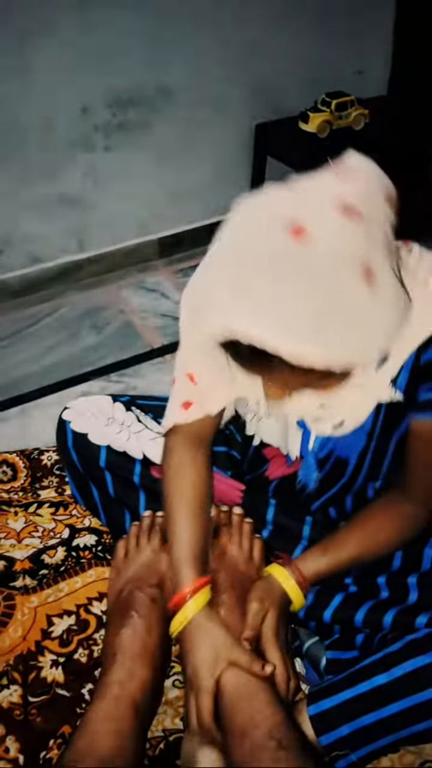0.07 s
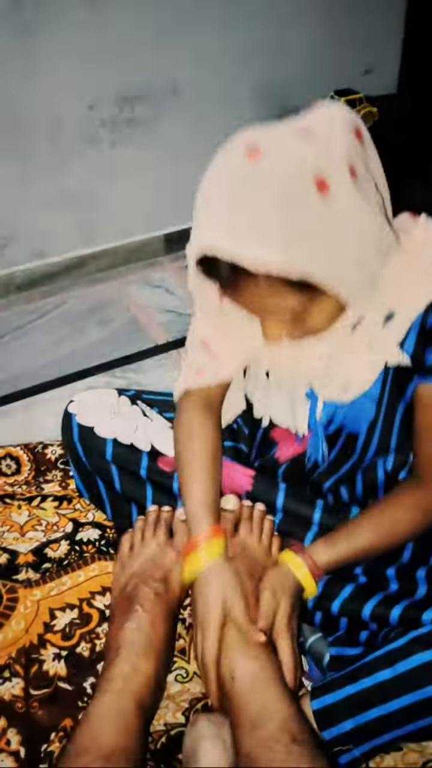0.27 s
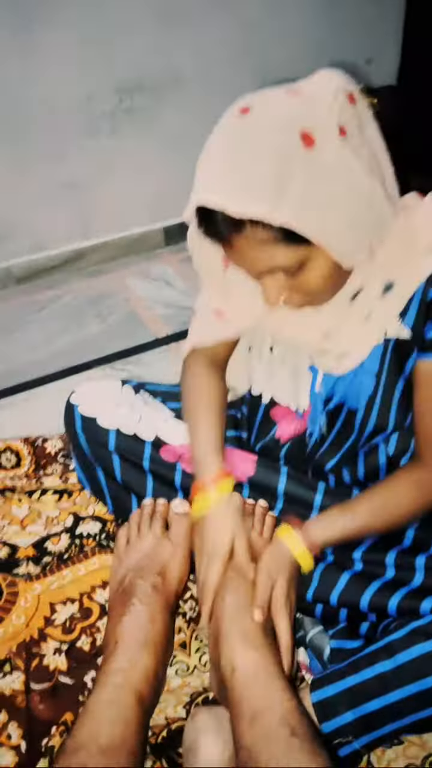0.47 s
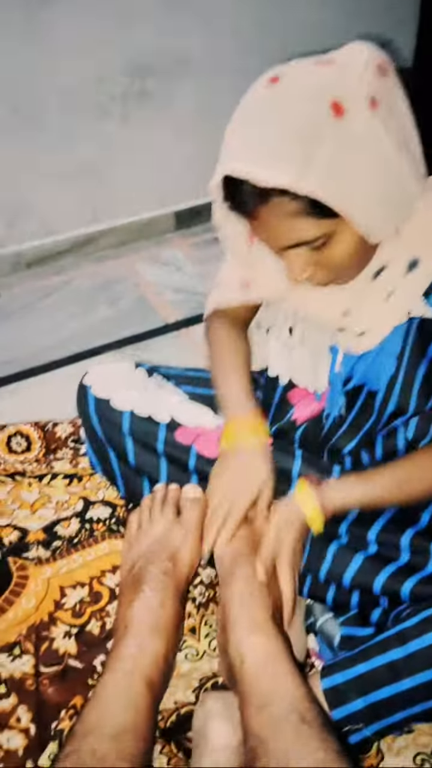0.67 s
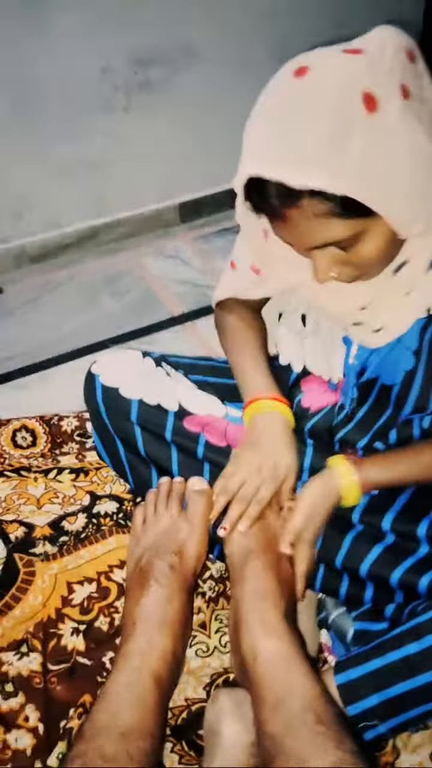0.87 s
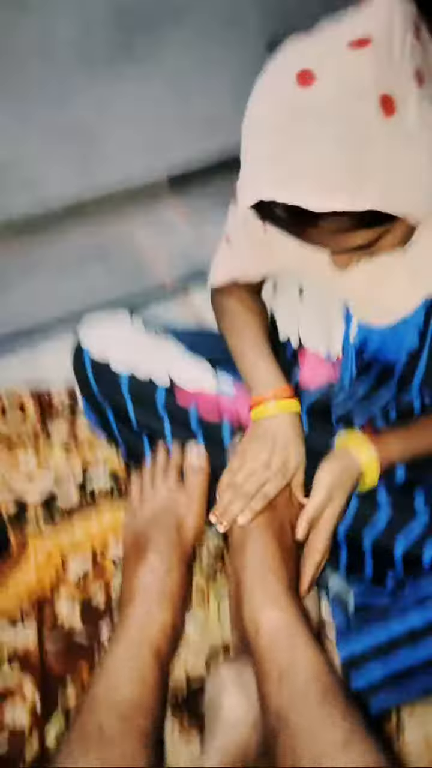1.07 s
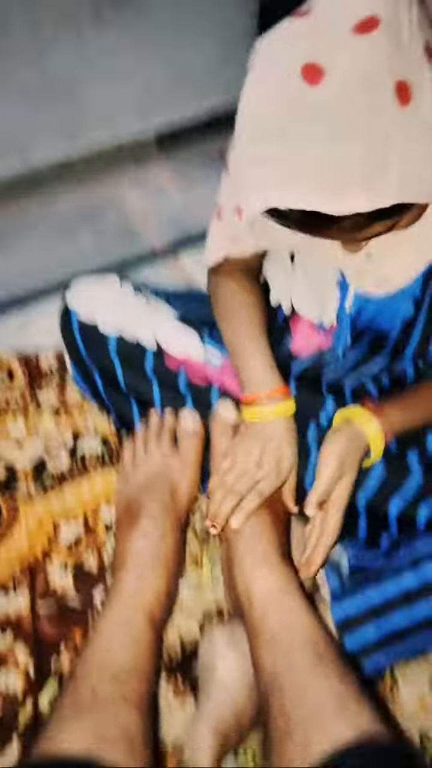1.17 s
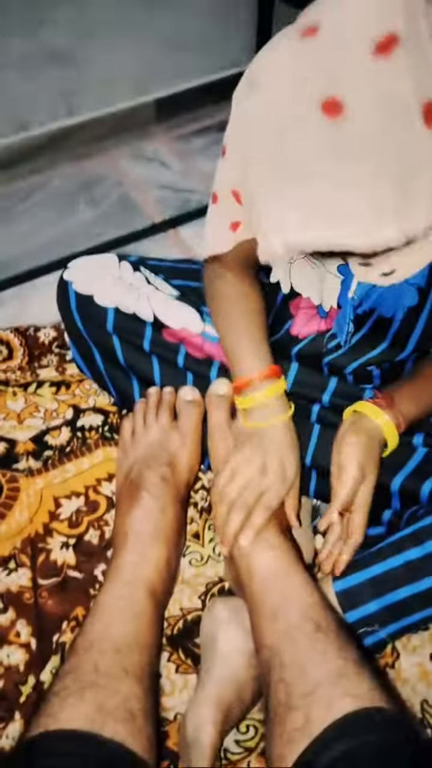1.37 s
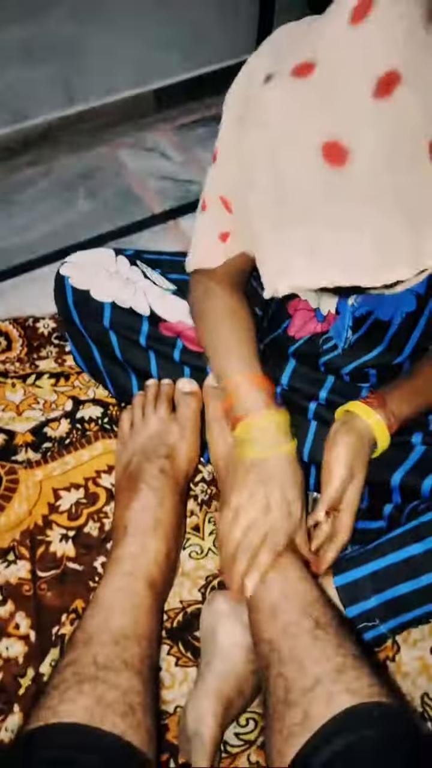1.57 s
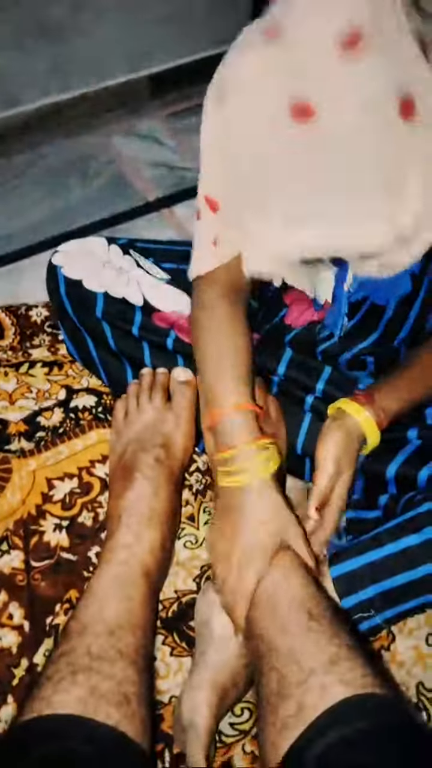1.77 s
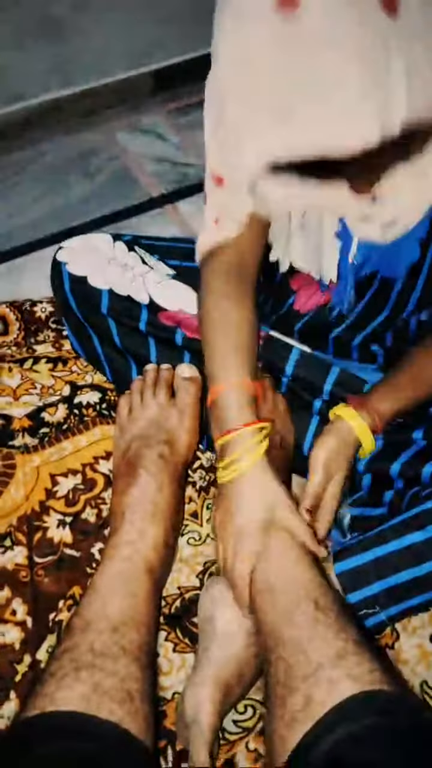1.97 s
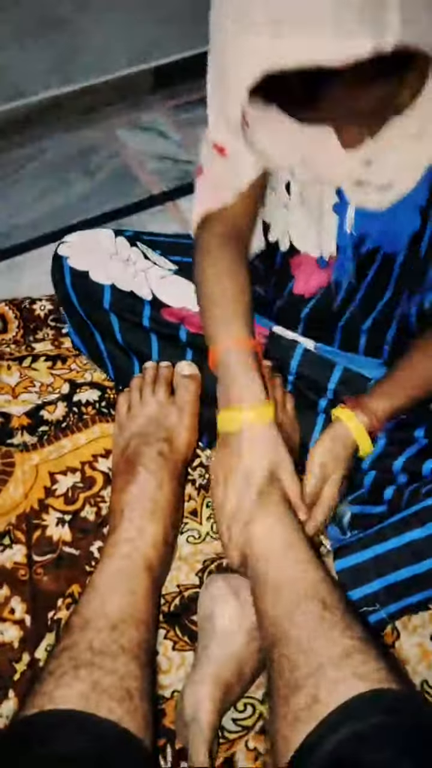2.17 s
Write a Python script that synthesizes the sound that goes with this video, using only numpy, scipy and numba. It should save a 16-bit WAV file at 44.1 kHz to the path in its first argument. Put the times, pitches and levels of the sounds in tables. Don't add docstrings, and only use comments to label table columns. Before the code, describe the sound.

Thin glass bangles rattle sharply in short clusters over soft skin rubbing and a faint room hum

```python
import sys
import numpy as np
from scipy import signal
from scipy.fft import rfft, irfft
from scipy.io import wavfile
from scipy.ndimage import uniform_filter1d
from numba import njit

SR = 44100
rng = np.random.default_rng(int(sys.argv[2]) if len(sys.argv) > 2 else 0)


def put_to_file(sound):
    columns = np.atleast_2d(sound).T
    safe = np.clip(columns, -1, 1)
    whole_steps = np.round(safe * 32767)
    wavfile.write(sys.argv[1], SR, whole_steps.astype(np.int16))


def natural_amplitude(level_db):
    exponent = np.asarray(level_db, float) / 20
    return 10 ** exponent


N = 97637

# f/Hz, level/dB per Hz
HUM_SPECTRUM = [(30, -38), (70, -14), (124, 1), (329, -1), (480, -12), (800, -8.5), (1900, -10.5),
                (2600, -17.5), (4300, -28)]
# f/Hz, width/Hz, level/dB
DUCT_RESONANCES = [(998, 310, -67.5), (1555, 170, -74), (1946, 240, -72.5)]
# t/s, level/dB
HAND_EFFORT = [(0.0, -70.5), (0.17, -57), (0.35, -54), (0.58, -56), (0.72, -54), (0.82, -61), (0.95, -66),
               (1.23, -58), (1.33, -56.5), (1.41, -51), (1.55, -60), (1.76, -51.5), (1.89, -61.5),
               (1.95, -59), (2.1, -68), (2.21, -73)]
# f/Hz, level/dB per Hz
SKIN_SPECTRUM = [(2500, -6), (4600, -2.5), (6200, 2), (7400, 0), (8600, 5.5), (11200, 5), (13000, 1),
                 (15700, -12)]
# t/s, level/dB
CLOTH_RUSTLE = [
    (0, -73),
    (.2, -64),
    (.55, -58.5),
    (.78, -59),
    (1.001, -62.5),
    (1.3, -65),
    (1.5, -72),
    (2.21, -96),
]
# t/s, peak level/dB, favoured f/Hz, rattle length/s
STACK_CLASHES = [(0.178, -33, 11100, 0.024), (0.204, -24.5, 10800, .006), (0.211, -27, 11000, 0.013),
                 (0.241, -41, 11000, 0.03), (0.354, -24.5, 10600, 0.0084), (0.363, -32, 10800, 0.0064),
                 (0.374, -27, 10600, 0.033), (0.622, -27, 10300, 0.004), (0.626, -24.5, 11000, 0.0036),
                 (0.6324, -17, 11600, 0.0019), (.635, -30, 11200, 0.0055), (.645, -24, 11800, .004),
                 (.650, -32, 11600, .012), (0.673, -31, 11600, 0.021), (0.696, -23.5, 11000, 0.015),
                 (0.71, -29, 10900, 0.023), (0.964, -46, 10700, 0.018), (0.98, -37.5, 11200, 0.014),
                 (1.127, -32, 11540, 0.022), (1.197, -32.5, 10800, 0.014), (1.27, -33, 11600, 0.033),
                 (1.329, -36.5, 9700, 0.025), (1.382, -27, 11500, 0.006), (1.3877, -24, 10400, 0.004),
                 (1.4, -24, 11500, 0.004), (1.404, -27.5, 8500, .002), (1.4058, -10, 11300, .003),
                 (1.4088, -13, 11300, .002), (1.412, -11.5, 11500, 0.00078), (1.4135, -16.5, 11300, .002),
                 (1.416, -12.5, 11000, .003), (1.421, -19.5, 11000, 0.004), (1.424, -29, 11500, .012),
                 (1.446, -22, 11400, 0.0087), (1.451, -25.5, 11100, .013), (1.719, -20, 11500, .002),
                 (1.7202, -19.5, 10940, 0.0044), (1.7245, -25, 12000, 0.0066), (1.739, -31, 12300, .009),
                 (1.749, -22.5, 10200, 0.0076), (1.762, -30.5, 10600, .015), (1.8447, -27, 11200, 0.01),
                 (1.863, -30, 12000, .018), (1.896, -26, 11100, 0.025), (1.912, -35, 11500, .018),
                 (1.953, -33, 10900, .02), (1.987, -36, 10900, 0.014), (2.095, -41, 11200, 0.01)]
# f/Hz, level/dB, t60/s
STACK_MODES = [(5630, -28, 0.024), (6640, -31.5, .012), (8530, -21, 0.019), (10430, -8.5, 0.015),
               (10110, -7, 0.02), (10800, -2.5, .02), (11200, -3, .022), (11600, -9, 0.054),
               (12400, -5, 0.017), (12670, -5, 0.011), (14200, -3, 0.011), (14200, -2.5, 0.0094),
               (15230, -10, .014), (15100, -1.5, .014)]
LOOSE_STRIKES = { "wide": [(1.325, -50.5), (1.752, -37.5), (1.848, -39.5), (1.898, -28.5), (1.9075, -23.5),
                 (1.918, -33), (1.926, -36), (1.940, -44), (1.947, -42), (1.958, -42), (1.966, -44),
                 (1.973, -43), (2.003, -45)], "slim": [(.960, -52.5), (1.198, -42.5), (1.212, -45),
                 (1.228, -42.5), (1.863, -28.5), (1.876, -30.5), (1.889, -32), (1.938, -50), (1.987, -37.5),
                 (1.997, -37), (2.018, -44), (2.050, -52), (2.078, -58), (2.097, -36.5)],
                 "free": [(1.856, -39), (1.866, -34.5), (1.879, -43), (1.903, -34.5), (2.104, -41),
                 (2.125, -54), (2.150, -46), (2.185, -63)], "thick": [(.632, -47.5), (.980, -61.5),
                 (1.410, -53), (1.425, -53.5), (1.445, -58), (1.463, -60), (1.483, -55.5), (1.500, -54.5),
                 (1.518, -55), (1.535, -58.5), (1.550, -59), (1.720, -50.5), (1.752, -54)],
                 "heavy": [(1.407, -38), (1.720, -46)], "small": [(.402, -51), (.420, -49), (.648, -40),
                 (.666, -47), (.678, -40), (.982, -57), (1.140, -47.5), (1.283, -43.5), (1.297, -43.5),
                 (1.312, -48), (1.434, -37.5), (1.785, -43)], "dull": [(.703, -50.5), (1.385, -53),
                 (1.391, -51), (1.411, -43), (1.447, -45), (1.460, -51.5), (1.721, -44.5), (1.900, -47.5)],
                 "bead": [(1.404, -34), (1.722, -45), (1.751, -35)], "wrist": [(1.095, -51.5),
                 (1.110, -53.5)]}
SKIN_CHOKES = {"wide": [1.790, 1.904, 1.934, 1.955, 1.982], "slim": [1.897, 2.008], "thick": [.643, 1.732,
               1.775], "small": [.662, .692, 1.793], "heavy": [1.445, 1.727], "free": [1.935, 1.9]}
LOOSE_MODES = {"wide": [(5180, -16, 0.027), (9820, 0, 0.049), (10100, -16.5, .1), (13500, -12, .03),
               (15700, -16, 0.037)], "slim": [(5510, -17.5, 0.04), (6000, -19.5, .025), (10640, 1.5, 0.04),
               (14500, -17, .025), (15680, -16, .04)], "free": [(5690, -16.5, 0.16), (10300, -4, 0.14),
               (10200, -3.5, 0.057)], "thick": [(3760, -3, 0.057), (3680, -2.5, 0.046)],
               "heavy": [(2375, -4.5, 0.068), (2090, -4, 0.019)], "dull": [(5580, -2.5, 0.038),
               (5950, -1.5, 0.028), (6670, -2, 0.03), (7990, -1, .03), (8576, -1.5, .03)],
               "bead": [(5320, -4, .006), (6300, 0, .005), (7100, 3, 0.0045), (8100, 1, .008)],
               "wrist": [(984, 1, 0.086)], "small": [(11600, -4, 0.049), (11600, -4.5, 0.035)]}
# start of closing t/s, reopening t/s
GATE_PAUSES = [
    (0.568, 0.609),
    (0.791, 0.8664),
    (1.017, 1.076),
    (1.213, 1.267),
    (1.571, 1.696),
]
STACK_SPREAD = 0.011


def level(x, db):
    return x * natural_amplitude(db) / np.sqrt(np.mean(x ** 2))


def colour(spectrum):
    hz, db = np.array(spectrum).T
    bins_hz = np.maximum(np.arange(N // 2 + 1) * SR / N, 1)
    shape = natural_amplitude(np.interp(np.log(bins_hz), np.log(hz), db))
    return level(irfft(rfft(rng.standard_normal(N)) * shape, N), 0)


def band(hz, width_hz, db):
    b, a = signal.iirpeak(hz, hz / width_hz, fs=SR)
    once = signal.lfilter(b, a, rng.standard_normal(N))
    return level(signal.lfilter(b, a, once), db)


def walk(rate_hz):
    k = int(SR / rate_hz)
    steps = np.repeat(rng.standard_normal(N // k + 1), k)
    return 3.8 * uniform_filter1d(uniform_filter1d(steps, k), k)[:N]


@njit
def ring(n, start, stop, pole, gain, rise, choked, choke):
    out = np.zeros(n)
    for k in range(len(start)):
        z, soft = gain[k] + 0j, 1.
        for i in range(start[k], min(n, stop[k])):
            soft *= rise
            out[i] += z.imag * (1 - soft)
            z *= pole[k] * (choke if i > choked[k] else 1.)
    return out


def strike(times, gains, hz, t60, choked_s=N / SR):
    contact_s, choke_t60_s = 0.00042, 0.004
    together = np.broadcast_arrays(times, gains, hz, np.maximum(t60, .002), choked_s)
    s, gain, f, t60, choked = [np.ravel(v) * 1. for v in together]
    pole = np.exp(2j * np.pi * np.minimum(f / SR, .45) - np.log(1000) / (t60 * SR))
    stop = np.minimum(s + t60, np.maximum(s, choked) + choke_t60_s)
    return ring(N, (s * SR).astype(int), (stop * SR).astype(int), pole, gain, np.exp(-1 / (contact_s * SR)),
                (choked * SR).astype(int), natural_amplitude(-60 / (choke_t60_s * SR)))


def hum():
    ducts = sum(band(*d) * natural_amplitude(1.85 * walk(5.82)) for d in DUCT_RESONANCES)
    air = colour(HUM_SPECTRUM) * natural_amplitude(-56.5 + 0.3 * walk(8.3))
    fan = band(117.3, 15.4, -65)
    return air + fan + ducts


def kneading():
    shivers_per_s, shiver_db = 500, 6
    effort_db = np.interp(np.arange(N) / SR, *np.array(HAND_EFFORT).T)
    hiss = colour(SKIN_SPECTRUM) * natural_amplitude(effort_db - 1.0 + 0.88 * walk(46.33))
    count = int(shivers_per_s * N / SR)
    times = rng.uniform(0, N / SR, count)
    hz, db, t60 = np.array(STACK_MODES)[rng.integers(3, 9, count)].T
    jolt_db = shiver_db * np.minimum(rng.exponential(size=count), 2) - 9.0
    db = db + effort_db[(times * SR).astype(int)] + jolt_db
    return hiss + strike(times, natural_amplitude(db), hz * (1 + STACK_SPREAD * rng.standard_normal(count)), t60)


def cloth():
    rustle_db = np.interp(np.arange(N) / SR, *np.array(CLOTH_RUSTLE).T)
    rub = band(2160, 1000, 0) + band(1570, 140, -5) + band(1970, 160, -6)
    return rub * natural_amplitude(rustle_db + .5 * walk(5.7))


def stack(count=9):
    start, peak_db, favoured_hz, rattle_s = np.array(STACK_CLASHES).T[..., None]
    mode_hz, mode_db, mode_t60 = np.array(STACK_MODES).T
    shape = (len(start), count)
    place = np.abs(np.arange(count) + .4 * rng.standard_normal(shape)) / count
    place[:, 0] = 0
    times = start + place * rattle_s
    first_db = 5 * (place == 0)
    uneven_db = 3.74 * rng.standard_normal(shape) * (place > 0)
    db = peak_db - 4 * place + uneven_db + first_db - 13
    db = db + 10 * np.log10(np.clip(rattle_s / 0.014, .05, 1))

    soft = np.clip((-14 - peak_db) / 30, 0, 1)
    octaves_off = np.log2(mode_hz / favoured_hz)
    near_db = 20.5 * soft * (np.exp(-(octaves_off / 0.083) ** 2) - 1)
    scatter_db = 3.5 * rng.standard_normal((*shape, len(mode_hz)))
    gains = natural_amplitude(db[..., None] + mode_db + near_db[:, None] + scatter_db)
    detune = rng.standard_normal((*shape, len(mode_hz)))
    hz = mode_hz * (1 + STACK_SPREAD * detune[:, :1] + 0.0077 * detune)
    settled_s = start + rattle_s + 0.0012
    modes = strike(times[..., None], gains, hz, mode_t60, settled_s[..., None])
    return modes, crack(times, db - 13 * soft)


def crack(times, db):
    blows = np.zeros(N)
    np.add.at(blows, (times * SR).astype(int).ravel(), natural_amplitude(db).ravel())
    puff = np.exp(-np.arange(400) / (0.0011 * SR))
    noise = np.convolve(blows, puff)[:N] * rng.standard_normal(N)
    treble = signal.butter(6, 9000, "high", fs=SR, output="sos")
    return natural_amplitude(-1.5) * signal.sosfilt(treble, noise)


def loose(count=3):
    chatter_s, chatter_db, pitch_spread = 0.0055, -7, 0.0042
    rows = []
    for name, strikes in LOOSE_STRIKES.items():
        for start, peak_db in strikes:
            choked_s = min([c for c in SKIN_CHOKES.get(name, []) if c > start] + [N / SR])
            for bounce in range(count):
                s = start + bounce * chatter_s * np.exp(0.33 * rng.standard_normal())
                for hz, mode_db, t60 in LOOSE_MODES[name]:
                    db = peak_db + mode_db + bounce * chatter_db + 2.5 * rng.standard_normal()
                    off_hz = hz * (1 + pitch_spread * rng.standard_normal())
                    rows.append((s, natural_amplitude(db), off_hz, t60, choked_s))
    return strike(*np.array(rows).T)


def room(x):
    lag = np.arange(SR // 2) / SR
    tail = rng.standard_normal(len(lag)) * natural_amplitude(-60 * lag / 0.59) * np.minimum(lag / 0.0054, 1)
    return signal.fftconvolve(x, tail / np.sqrt(np.sum(tail ** 2)))[:N] * natural_amplitude(-7)


def scene():
    bed = hum() + kneading() + cloth()
    damped, cracks = stack()
    chimes = loose()
    wet = room(cracks + damped * natural_amplitude(-5) + chimes * natural_amplitude(-5))
    return (bed + damped + cracks + chimes + wet)[None]


def roll_off(x):
    return signal.sosfilt(signal.butter(12, 16960, fs=SR, output="sos"), x)


def record(dry):
    close_db_per_s, open_s, top_hz = 466, 0.0069, 15720
    t = np.arange(N) / SR
    gain = np.ones(N)
    for shut, opens in GATE_PAUSES:
        low = natural_amplitude(-close_db_per_s * np.clip(t - shut, 0, opens - shut))
        recovery = np.exp(-np.maximum(t - opens, 0) / open_s)
        gain = gain * (1 - (1 - low) * recovery)
    top_cut = signal.ellip(10, .2, 70, top_hz, fs=SR, output="sos")
    mix = signal.sosfilt(top_cut, dry * gain)
    return roll_off(mix)


dry = scene()
out = record(dry)
put_to_file(out)
```